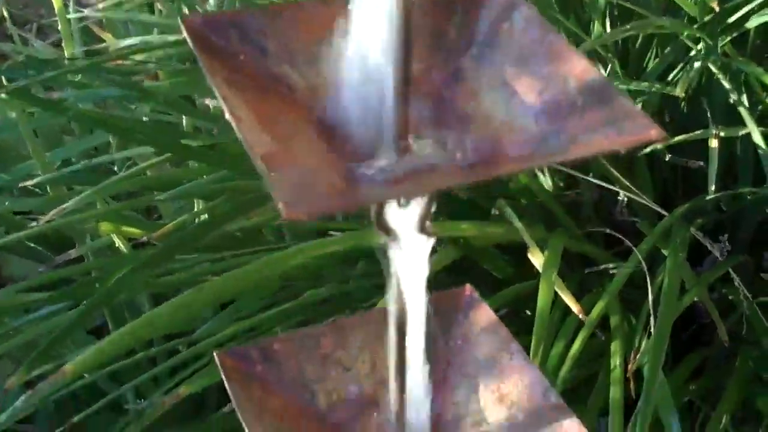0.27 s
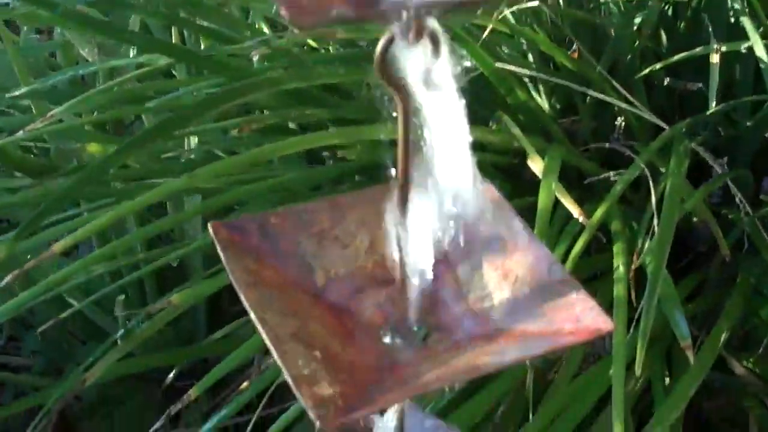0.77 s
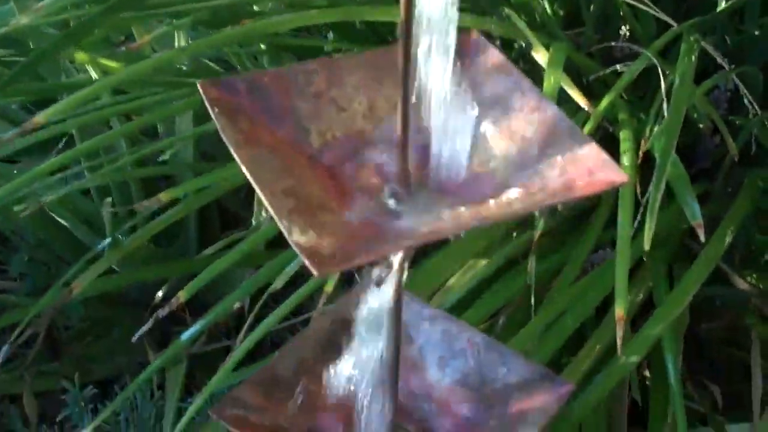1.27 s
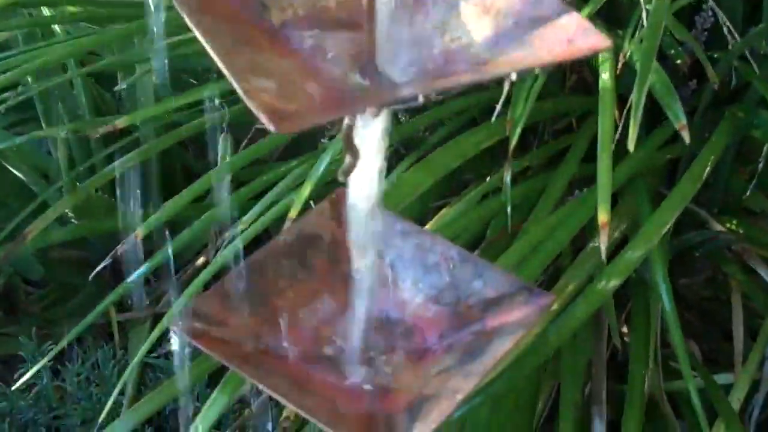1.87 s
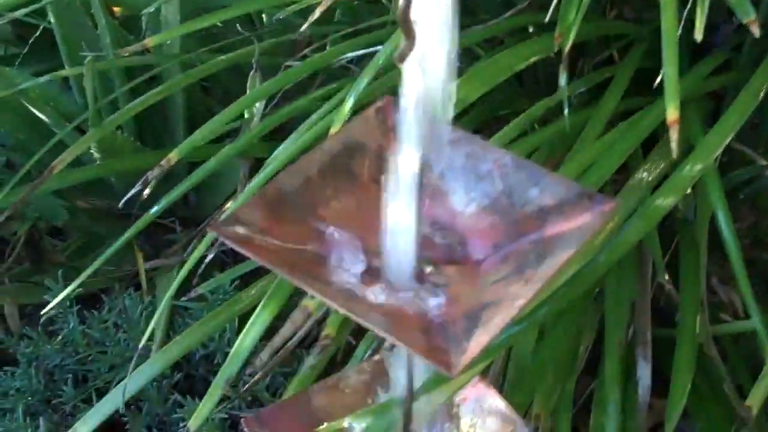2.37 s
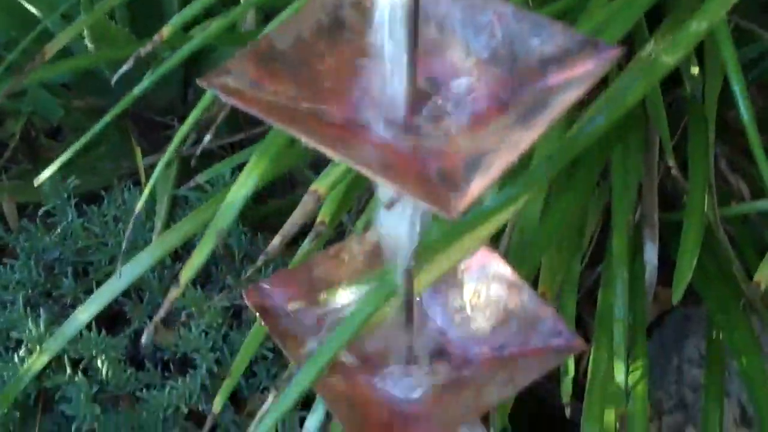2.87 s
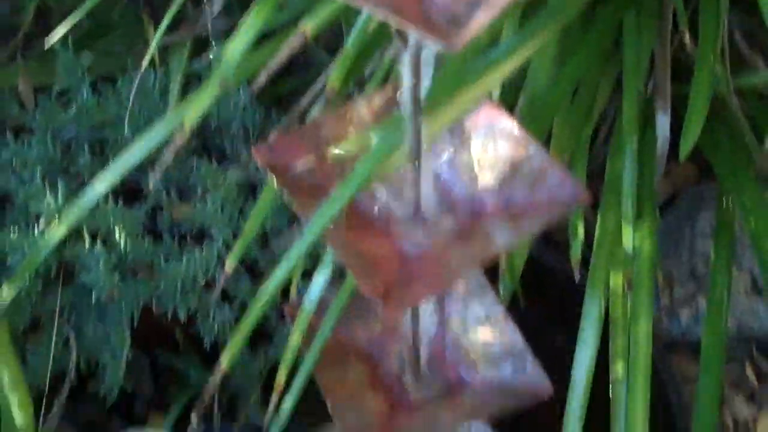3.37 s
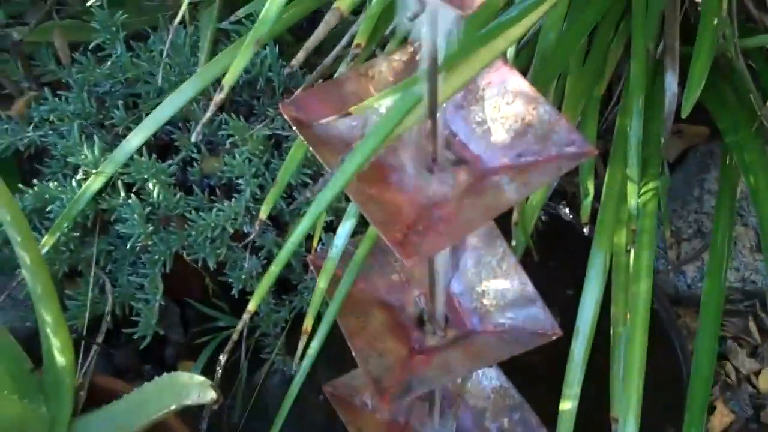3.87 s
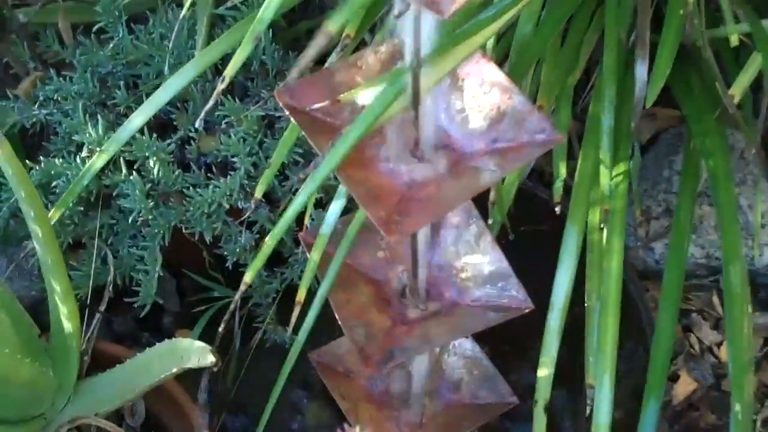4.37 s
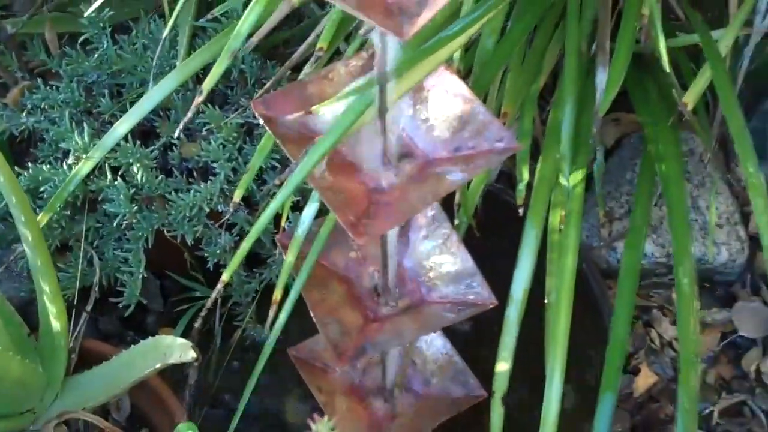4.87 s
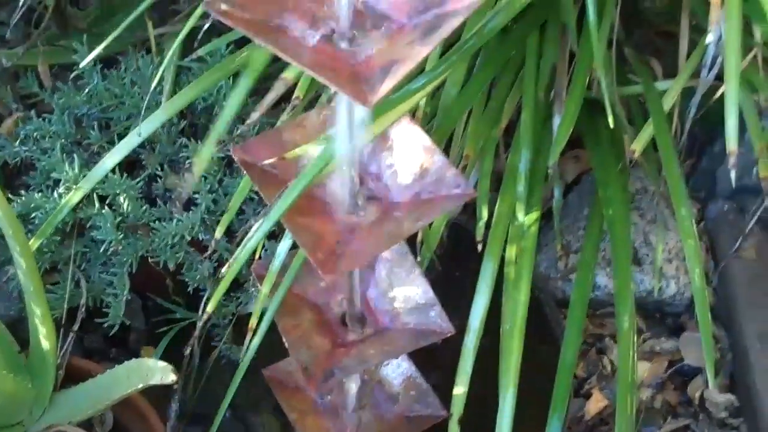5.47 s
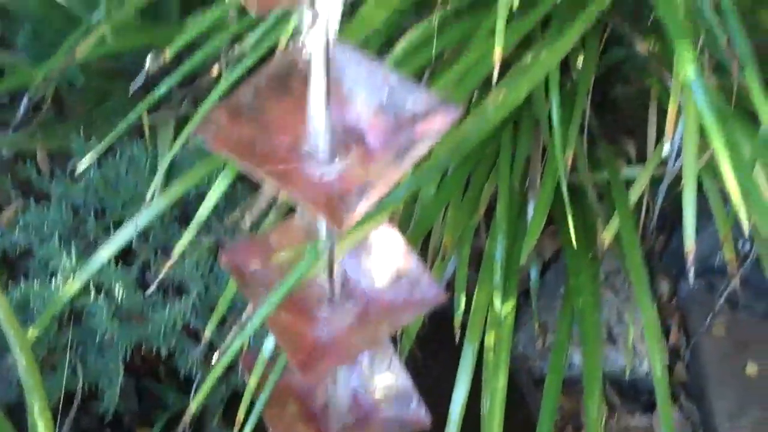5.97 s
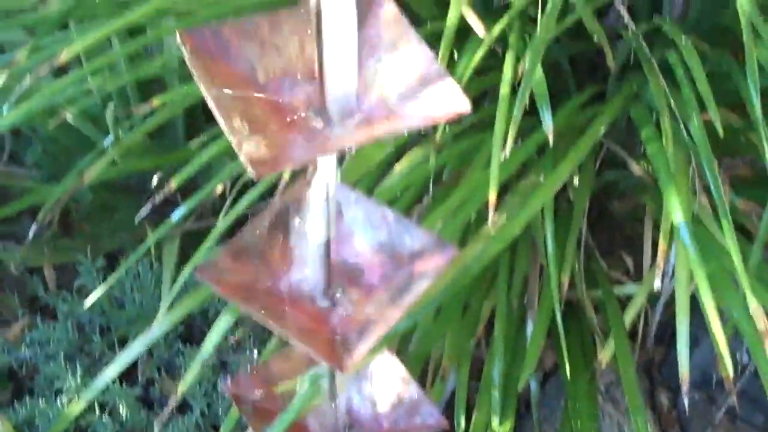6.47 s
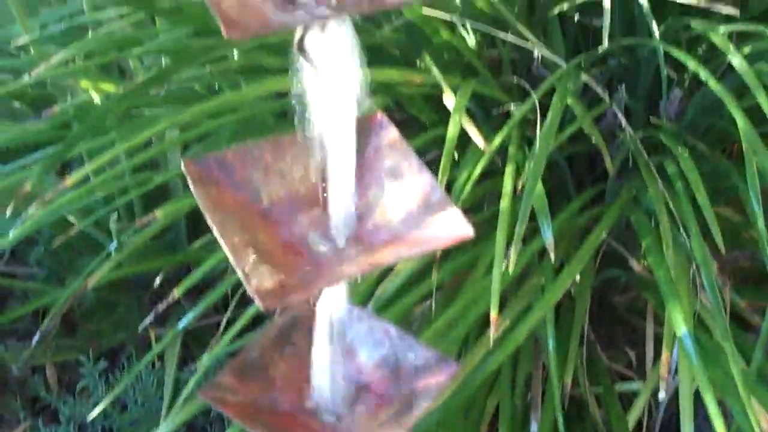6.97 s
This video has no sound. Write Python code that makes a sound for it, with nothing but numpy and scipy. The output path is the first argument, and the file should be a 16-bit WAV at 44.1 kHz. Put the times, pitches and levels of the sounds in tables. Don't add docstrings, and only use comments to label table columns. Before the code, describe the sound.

Close, bright patter of water falling cup to cup on a metal rain chain, fluttering quickly, with snapping drops and faint low outdoor hum.

```python
import sys
import numpy as np
from scipy import signal
from scipy.io import wavfile
from scipy.ndimage import uniform_filter1d

SR = 44100
rng = np.random.default_rng(int(sys.argv[2]) if len(sys.argv) > 2 else 0)


def voltage_ratio(level):
    return 10 ** (np.asarray(level, float) / 20)


def waveform_to_disk(signal):
    frames = np.transpose(np.atleast_2d(signal))
    scaled = np.clip(frames, -1, 1) * 32767
    samples = np.round(scaled).astype(np.int16)
    wavfile.write(sys.argv[1], SR, samples)


N = 317520


def evened(x):
    return x / np.sqrt(np.mean(x ** 2) + 1e-20)


def read(points, hz):
    f, value = np.transpose(points)
    return np.interp(np.log(hz + 1), np.log(f + 1), value)


def scatter(s, sounds):
    first = np.round(np.maximum(s, 0) * SR).astype(int)
    at = first[:, None] + np.arange(sounds.shape[1])
    return np.bincount(at.ravel(), sounds.ravel(), N)[:N]


def plinks(s, db, hz, cycles, glide, size):
    swell = cycles / 2.0 / hz
    t = np.arange(size) / SR
    u = t / swell[:, None]
    rise = np.sin(np.pi / 2 * np.minimum(u, 1)) ** 2
    decay = np.exp(-np.maximum(u - 1, 0) / 1.39)
    shape = np.where(u < 1, rise, decay) * np.linspace(1, 0, size) ** 0.15
    bend = 1 + glide[:, None] * np.minimum(u - 1, 3)
    tone = shape * np.cos(2 * np.pi * hz[:, None] * (t - swell[:, None]) * bend)
    return scatter(s - swell, voltage_ratio(db)[:, None] * tone)


def noise(db, size, wide, long):
    hop = size // 4
    hz = np.fft.rfftfreq(size, 1 / SR)[:, None]
    t = np.arange(N // hop + 5) * hop / SR
    real, imaginary, patches = rng.standard_normal((len(t), len(hz), 3)).T
    patches = uniform_filter1d(patches, round(wide), axis=0)
    patches = evened(uniform_filter1d(patches, round(long), axis=1))
    spectra = (real + 1j * imaginary) * voltage_ratio(db(hz, t, patches))
    return signal.istft(spectra, nperseg=size, noverlap=size - hop)[1][:N]


# first slug in seconds, gap in seconds,
# number of slugs, level in dB, brightness in dB.
RUNS = [(.18, 0.11, 2, -36.5, 0), (.454, 0.1, 5, -34.5, 1.4), (1.012, 0.11, 5, -37.5, 1),
        (1.508, 0.094, 2, -37, -1.5), (1.7, 0.073, 9, -35.5, 2), (2.393, 0.12, 5, -38, 4.5),
        (3.012, 0.093, 4, -36.5, 0.7), (3.385, 0.099, 7, -38.5, 1.5), (4.135, 0.12, 2, -40.5, 4.5),
        (4.411, 0.1072, 6, -37, 1), (5.04, .11, 3, -40, -0.5), (5.388, 0.16, 2, -38.5, 1.5),
        (5.691, 0.12, 2, -36.5, 0.5), (5.903, 0.08, 5, -40, 0.8), (6.455, 0.081, 9, -39.5, 2)]
# time in seconds, level in dB, length in seconds,
# brightness in dB.
HEAVY_SLUGS = [(0.168, -41, 0.1, 9), (0.35, -34, 0.034, -1), (0.457, -36.5, 0.073, -2),
               (.711, -37.5, .012, -0.5), (0.766, -40, .04, -3), (1.05, -36, 0.016, 0),
               (1.127, -40, .017, -13), (1.316, -30.5, 0.01, -1.5), (1.636, -35, .021, 4.5),
               (1.711, -37, 0.13, 0), (1.75, -33.5, .06, 0.5), (1.841, -36, .03, 2.5),
               (1.974, -37.5, 0.02, 5), (2.102, -38, 0.026, -3), (2.31, -35.5, 0.036, 3),
               (2.734, -42, 0.025, 1.5), (3.12, -34, 0.04, 0.5), (3.221, -35, 0.13, 2),
               (3.719, -38, 0.027, .5), (3.779, -39, 0.067, 6.5), (3.885, -34.5, 0.0092, -0.5),
               (4.135, -35.5, 0.038, 0.5), (4.53, -37, 0.059, 1), (4.755, -36.5, 0.041, 4.5),
               (5.14, -40, 0.03, -2), (5.437, -34, 0.011, 4.5), (5.903, -35, .07, 3),
               (6.728, -36, 0.032, 2.5), (6.857, -39.5, 0.021, 2.5), (7.11, -35, 0.033, 3)]


def slugs():
    even = []
    for s, gap, count, db, bright_db in RUNS:
        length = 0.46 * gap
        even += [(s + k * gap, db, length, bright_db) for k in range(round(count))]
    return np.array(even + HEAVY_SLUGS)


# time in seconds, level in dB.
TRICKLE = [(0.0, -31.5), (0.26, -40), (1.1, -37), (1.82, -37), (2.42, -34.5), (2.57, -34), (3.15, -36.5),
           (3.29, -37.5), (4.39, -37.5), (4.55, -41.5), (5.37, -38), (5.52, -42), (5.69, -41),
           (5.94, -37.5), (6.26, -36), (6.52, -35), (6.88, -37.5), (7.2, -35)]


def flow(t):
    s, db, length, bright_db = slugs().T[:, :, None]
    late = (t - s) / np.maximum(length, .005)
    steepness = np.where(late < 0, 7.0, 2.2)
    slug = voltage_ratio(db) ** 2 * np.exp(-steepness * late ** 2)
    trickle = voltage_ratio(np.interp(t, *np.transpose(TRICKLE)) - 1.5) ** 2
    power = trickle + 0.68 * slug.sum(0)
    return 10 * np.log10(power), (slug * bright_db).sum(0) / power


# pitch in Hz, strength in dB per Hz.
SPLASH = [(290, -30), (500, -22), (1040, -10), (1400, -10.5), (1740, -0.5), (4360, -0.5), (6340, -4),
          (9100, -2), (13200, -12.5), (13800, -9.5)]


def colour_db(hz, t):
    grid = np.arange(0, N / SR + .01, .002)
    level_db, bright_db = (np.interp(t, grid, curve) for curve in flow(grid))
    octaves = np.log2(np.clip(hz, 1500, 11000) / 4700)
    return read(SPLASH, hz) + level_db + 0.6 * bright_db * octaves


def patter(count, low_hz, high_hz, cycles, spread_db, db):
    when, pitch, big, ring, bend = rng.random((count, 5)).T
    s = when * N / SR
    hz = low_hz * (high_hz / low_hz) ** pitch
    size_db = spread_db * np.minimum(-np.log(big + 1e-9), 3.5)
    even_db = 10 * np.log10((hz / 4000) ** 2 / cycles)
    level_db = db + size_db + even_db + colour_db(hz, s)
    return plinks(s, level_db, hz, cycles * (.5 + ring), 0.11 * bend, size=200)


def hiss():
    flicker = evened(uniform_filter1d(rng.standard_normal(N // 64 + 5), 4))

    def spray_db(hz, t, patches):
        return colour_db(hz, t) + 1.88 * patches + 2.22 * flicker

    return voltage_ratio(-18.5) * noise(spray_db, size=256, wide=5, long=14)


def strays(count, low_hz, high_hz, cycles, over_db, spread_db):
    when, pitch, big, ring = rng.random((count, 4)).T
    grid = np.arange(0, N / SR, .002)
    passed = np.cumsum(voltage_ratio(3.0 * flow(grid)[0]))
    s = np.interp(when * passed[-1], passed, grid)
    db = flow(s)[0] + over_db + spread_db * big
    return np.c_[s, db, low_hz * (high_hz / low_hz) ** pitch, cycles * (.5 + ring)]


# time in seconds, peak in dB, pitch in Hz, length in cycles.
SMACKS = [(.0455, -18, 6400, 3.9), (.4582, -18, 4750, 5.9), (.6545, -24, 5710, 4), (.9956, -19, 5280, 2.5),
          (1.324, -19, 5380, 3.3), (1.3929, -19.5, 5260, 4), (1.5125, -17, 3750, 5.7),
          (1.633, -20.5, 4800, 3.9), (2.0997, -12.5, 8200, 5.6), (2.122, -20, 5180, 4.6),
          (2.1725, -17, 3230, 4.7), (2.2377, -15, 8030, 3.9), (1.5932, -25, 6000, 6.2),
          (2.718, -19, 4070, 3.3), (2.8383, -21.5, 4420, 9.2), (3.0075, -15.5, 7320, 3.9),
          (3.0699, -13, 6820, 9.3), (3.2221, -19, 5200, 2.9), (3.6766, -21.5, 6520, 10),
          (3.8842, -21.5, 4690, 5.6), (3.9538, -19, 5200, 3.3), (4.122, -18, 5500, 4.6),
          (4.1357, -19, 5370, 2.8), (4.7542, -20.5, 6000, 3.2), (4.813, -19, 4600, 2.1),
          (6.0399, -18, 7550, 3.8), (6.4613, -13, 7600, 5), (6.544, -21, 4550, 3.8),
          (6.8603, -20.5, 4920, 6.1), (7.1054, -21, 5600, 4.2)]
# time in seconds, peak in dB.
SNAPS = [(0.0215, -20), (.142, -17), (.176, -17.5), (.5592, -18), (.8532, -23.5), (1.0115, -18.5),
         (1.424, -26.5), (1.6916, -20), (1.777, -24), (2.2662, -19.5), (2.3104, -24.5), (2.9872, -21.5),
         (3.0245, -22.5), (3.2119, -16.5), (3.2613, -20.5), (3.5025, -18), (3.575, -16), (3.596, -17),
         (3.709, -23), (4.11, -22), (4.266, -21.5), (4.385, -22.5), (4.5083, -20.5), (5.5943, -21.5),
         (5.8711, -19), (6.409, -23)]
# time in seconds, peak in dB.
TAPS = [(.1051, -23), (0.1127, -21.5), (0.345, -26), (.6704, -24), (.7543, -24.5), (.8963, -23),
        (1.8905, -18.5), (2.4134, -24), (2.4986, -23.5), (2.5769, -19.5), (2.6177, -24), (2.7597, -22.5),
        (2.8527, -25), (2.9339, -22.5), (3.1244, -22), (3.232, -25), (3.2623, -20.5), (3.3522, -25.5),
        (4.216, -27.5), (4.3923, -22.5), (4.513, -22.5), (4.6257, -25), (5.8053, -25), (6.167, -29),
        (6.73, -27.5), (6.7846, -25), (6.803, -25.5), (6.8243, -22.5), (7.189, -21.5)]


def smacks():
    snaps = [(s, db, 9540, 3.4) for s, db in SNAPS]
    taps = [(s, db, 5200, 4.5) for s, db in TAPS]
    lesser = strays(count=40, low_hz=5500, high_hz=11520, cycles=5.2, over_db=3, spread_db=8)
    s, db, hz, cycles = np.r_[SMACKS, snaps, taps, lesser].T
    ring = plinks(s, db - 1.2, hz, np.maximum(cycles, 1), np.full(len(s), .07), size=300)
    sheet = plinks(s - .001, db - 11.5, .62 * hz, np.full(len(s), 5.0), np.full(len(s), .16), size=300)
    band = signal.butter(2, [2200, 10500], "band", fs=SR)
    spray = signal.lfilter(*band, rng.standard_normal((len(s), 150)))
    u = np.arange(150) / SR / 0.00065
    splat = voltage_ratio(db - 9.5)[:, None] * spray * u * np.exp(1 - u)
    return ring + sheet + scatter(s - .0004, splat)


# time in seconds, peak in dB, pitch in Hz, length in cycles.
BUBBLES = [(.6566, -28.5, 1724, 2.9), (.8116, -36, 1142, 5.3), (.877, -29.5, 1490, 4),
           (.8945, -30.5, 1580, 4), (.9071, -32, 2235, 3.5), (1.3524, -33.5, 1676, 4.8),
           (1.6051, -36, 1685, 13.5), (1.6987, -25.5, 2640, 3.7), (1.7458, -24.5, 2407, 4),
           (2.1446, -29.5, 2200, 6.8), (2.2078, -26, 1642, 4.5), (2.737, -25, 2995, 2.24),
           (2.9823, -30, 2402, 7.4), (3.0166, -28.5, 2510, 6), (3.0356, -24.5, 2870, 2.2),
           (3.1173, -23.5, 2890, 3.7), (3.2184, -29.5, 2310, 5.6), (3.6874, -29, 2010, 3.6),
           (3.7121, -35, 1870, 5.4), (4.1411, -31.5, 1750, 4.1), (4.2505, -28.5, 2250, 3),
           (4.282, -34, 2030, 5), (4.303, -39, 2120, 4), (4.3334, -35.5, 1783, 6.1),
           (5.1512, -31, 1660, 2.3), (5.2955, -32, 1430, 2.2), (5.7087, -33.5, 1740, 4.7),
           (7.0156, -29, 1970, 2.07), (7.0429, -33, 2064, 2.9), (7.1152, -31.5, 1700, 6.8)]


def bubbles():
    lesser = strays(count=28, low_hz=1750, high_hz=2900, cycles=3.9, over_db=-1.5, spread_db=5)
    s, db, hz, cycles = np.r_[BUBBLES, lesser].T
    return plinks(s, db - .5, hz, np.maximum(1.5 * cycles, 1), np.full(len(s), .03), size=800)


# time in seconds, peak in dB, push (+1) or pull (-1),
# width in milliseconds.
KNOCKS = [
    (.1771, -26.5, -1, 0.18),
    (3.0227, -37, -1, .17),
    (3.0704, -29.5, -1, 0.2),
    (3.2618, -32.5, -1, 0.23),
    (3.521, -22.5, 1, 0.1),
    (3.8808, -39.5, 1, .17),
    (4.427, -17, 1, 0.077),
    (6.0396, -37, 1, 0.2),
]


def knocks():
    s, db, sign, ms = np.transpose(KNOCKS)
    from_peak_ms = (np.arange(80) - 40) / SR * 1000
    push = np.exp(-(from_peak_ms / ms[:, None]) ** 2)
    return scatter(s - 40 / SR, (np.sign(sign) * voltage_ratio(db))[:, None] * push)


# time in seconds, pitch in Hz, level in dB.
HUM = [
    (0, 134, -78.5),
    (1.2, 132.5, -74),
    (2.3, 129.5, -74.5),
    (2.7, 133.5, -79),
    (6.4, 128.4, -91.5),
    (6.7, 130, -77.5),
    (7.2, 137.4, -81),
]


def hum():
    t = np.arange(N) / SR
    s, hz, db = np.transpose(HUM)
    waver_db = 0.76 * evened(uniform_filter1d(rng.standard_normal(N), 5000))
    level = np.sqrt(2) * voltage_ratio(np.interp(t, s, db) + waver_db)
    return level * np.sin(2 * np.pi * np.cumsum(np.interp(t, s, hz)) / SR)


# time in seconds, length in seconds, level in dB.
PUFFS = [
    (1.615, 0.12, -59),
    (2.496, 0.02, -61),
    (5.858, 0.14, -63),
    (6.15, 0.032, -66),
    (7.148, .09, -58.5),
]


def breeze():
    t = np.arange(N) / SR
    low = signal.butter(1, 12, fs=SR, output="sos")
    air = evened(signal.sosfilt(low, rng.standard_normal(N)))
    gusts = sum(voltage_ratio(db) * np.exp(-((t - s) / length) ** 4) for s, length, db in PUFFS)
    return gusts * (0.54 * air + 0.94)


# pitch in Hz, strength in dB per Hz.
GARDEN = [(12, -30), (20, -11.5), (31, -17), (54, -23), (233, -16), (341, -18), (1010, -7.5), (1500, -11),
          (1950, -41), (3300, -120)]


def garden():
    wash = noise(lambda hz, t, patches: read(GARDEN, hz) + 3.0 * patches, size=2048, wide=5, long=6)
    return voltage_ratio(-58.5) * evened(wash)


def reflected(near):
    t = np.arange(1500) / SR
    echo = rng.standard_normal(1500) * np.exp(-t / 0.0072) * (t > .001)
    return near + voltage_ratio(-9.5) * signal.oaconvolve(near, echo / np.linalg.norm(echo))[:N]


def scene():
    ticks = patter(count=2500, low_hz=2400, high_hz=8900, cycles=1.3, spread_db=3.0, db=-1.5)
    drops = patter(count=16000, low_hz=1094, high_hz=13310, cycles=3.0, spread_db=3.5, db=-2.5)
    gurgle = patter(count=2500, low_hz=1028, high_hz=6000, cycles=4.1, spread_db=3.0, db=4.0)
    near = reflected(ticks + drops + gurgle + smacks() + bubbles())
    no_bass = signal.butter(3, 700, "high", fs=SR, output="sos")
    near = signal.sosfilt(no_bass, near)
    return (near + hiss() + knocks() + hum() + breeze() + garden())[None]


def thinned(x):
    hz, t, z = signal.stft(x, SR, nperseg=2048, noverlap=1536)
    power = abs(z) ** 2
    around = uniform_filter1d(np.log(power + 1e-20), 32, axis=0)
    around = np.exp(uniform_filter1d(around, 3, axis=1))
    # (Hz, dB against its surroundings)
    bar = [(60, -20), (150, -3), (450, -2), (800, -20), (9000, -20), (11000, -2), (14000, .5)]
    weak = uniform_filter1d(power, 5, axis=0) < around * voltage_ratio(2 * read(bar, hz))[:, None]
    return signal.istft(z * np.where(weak, voltage_ratio(-16), 1), SR, nperseg=2048, noverlap=1536)[1][:N]


def band_limit(x):
    return signal.sosfilt(signal.butter(12, 15050, fs=SR, output="sos"), x)


def record(dry):
    edge = signal.firwin(1023, 13950, window=("kaiser", 9), fs=SR)
    limited = signal.oaconvolve(dry[0], edge, "same")
    mix = thinned(limited)[None] - 0.00059
    return band_limit(mix)


dry = scene()
out = record(dry)
waveform_to_disk(out)
```